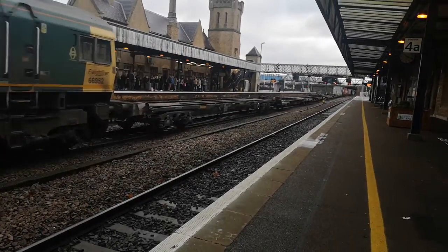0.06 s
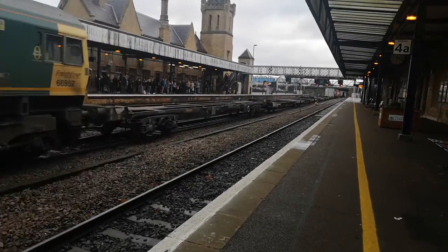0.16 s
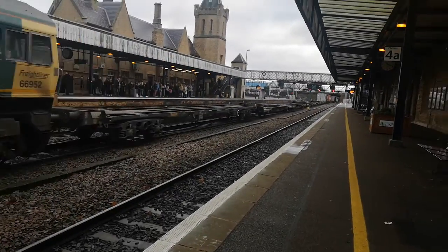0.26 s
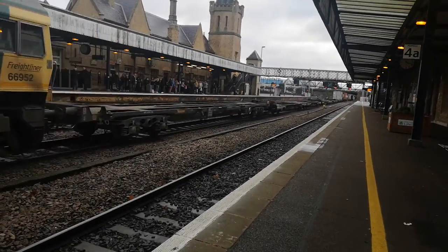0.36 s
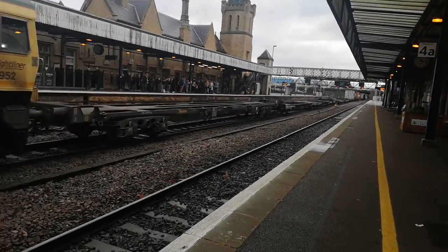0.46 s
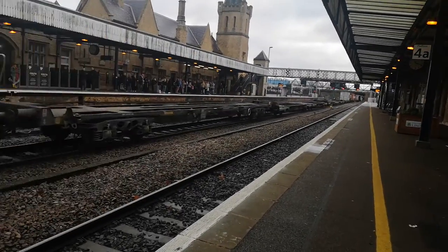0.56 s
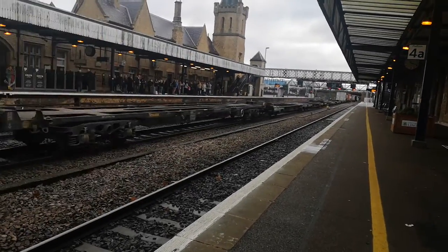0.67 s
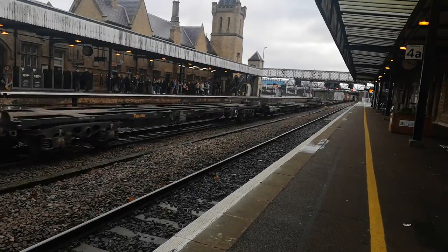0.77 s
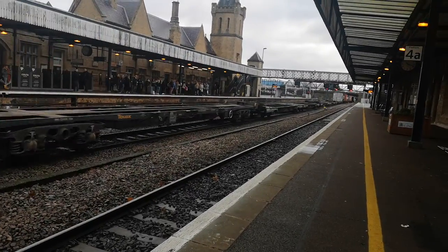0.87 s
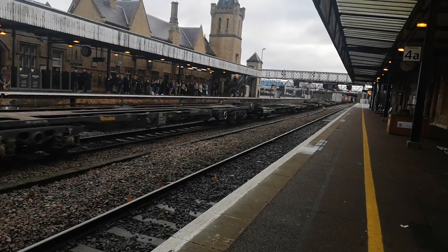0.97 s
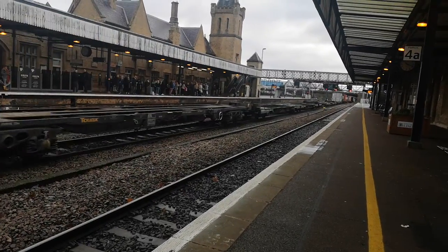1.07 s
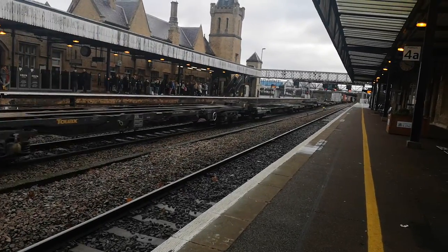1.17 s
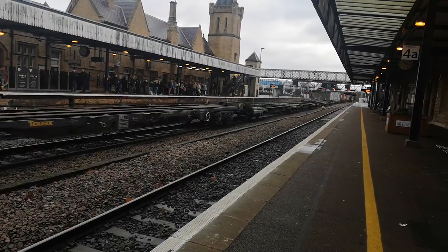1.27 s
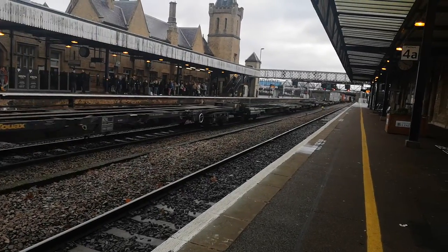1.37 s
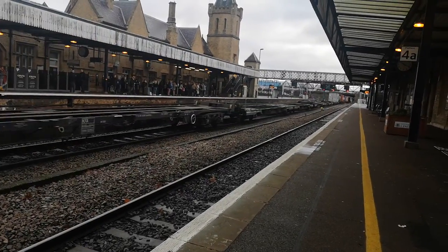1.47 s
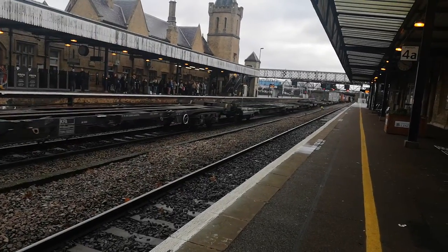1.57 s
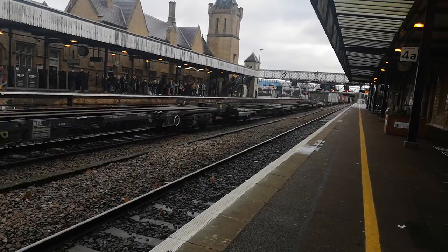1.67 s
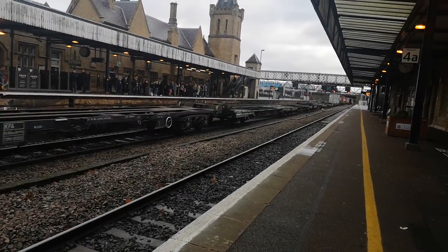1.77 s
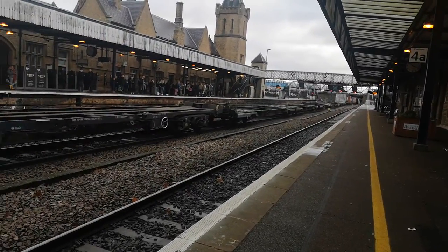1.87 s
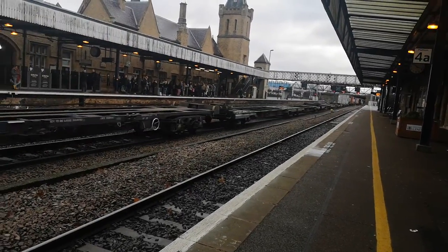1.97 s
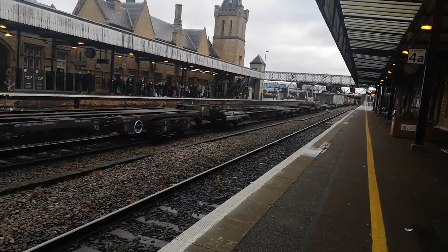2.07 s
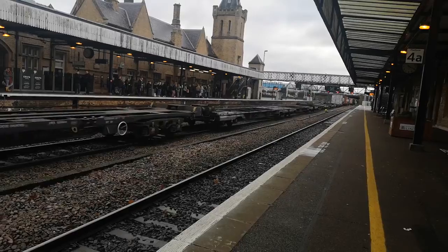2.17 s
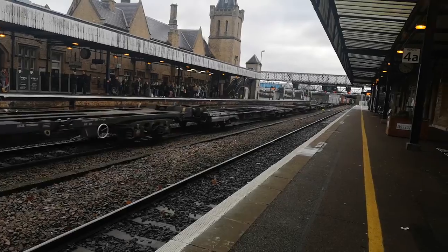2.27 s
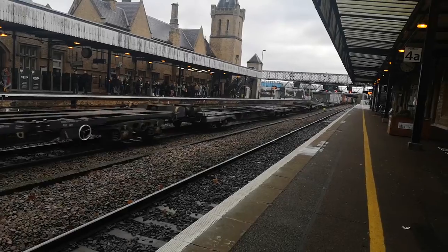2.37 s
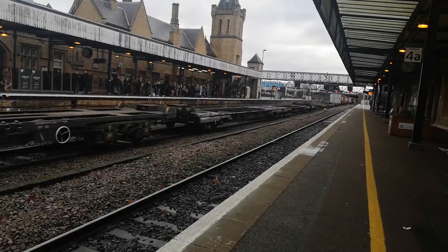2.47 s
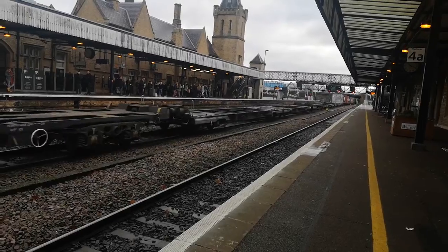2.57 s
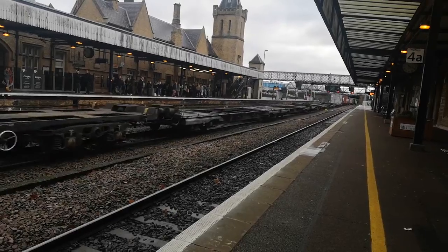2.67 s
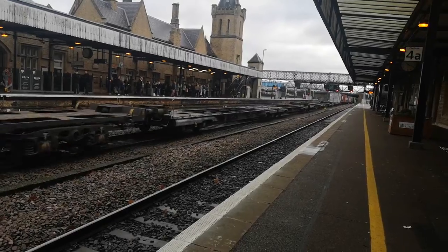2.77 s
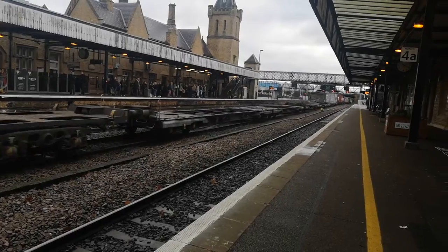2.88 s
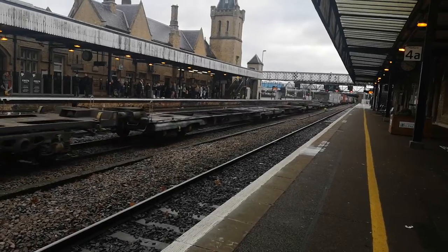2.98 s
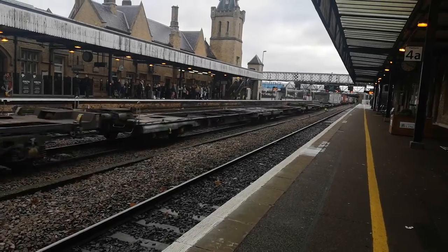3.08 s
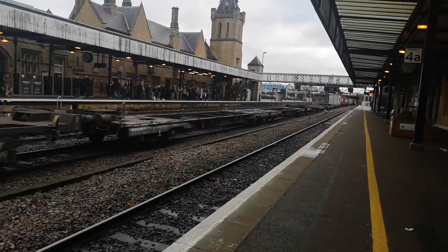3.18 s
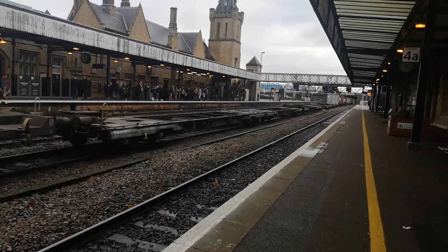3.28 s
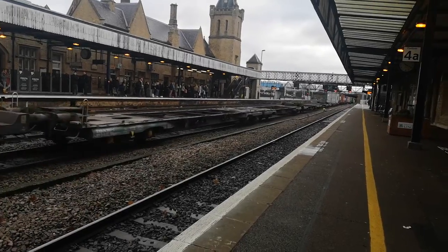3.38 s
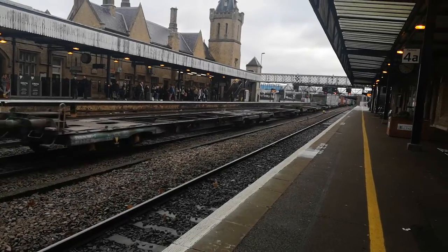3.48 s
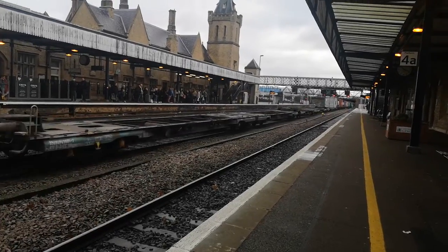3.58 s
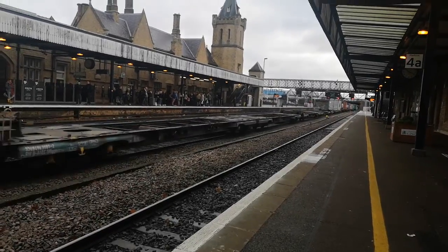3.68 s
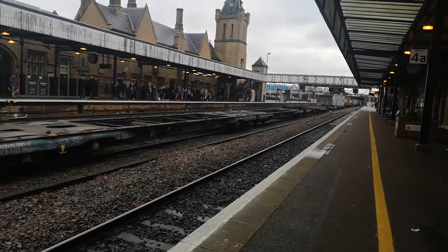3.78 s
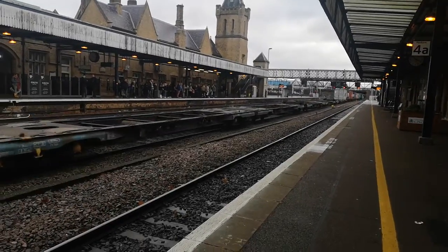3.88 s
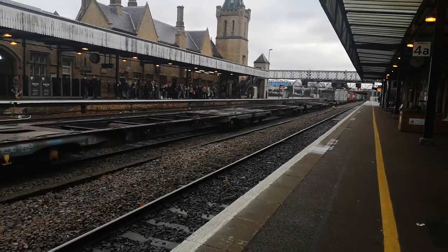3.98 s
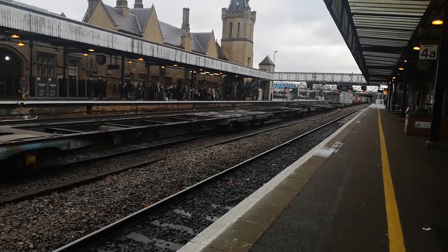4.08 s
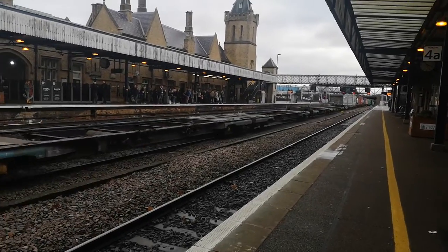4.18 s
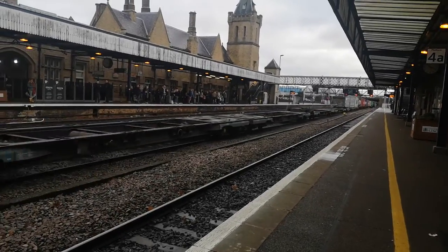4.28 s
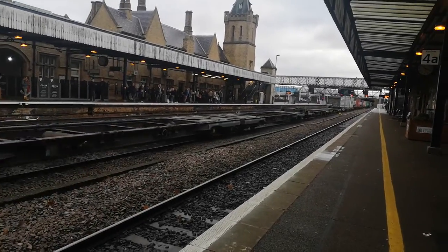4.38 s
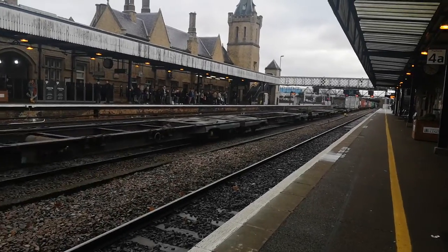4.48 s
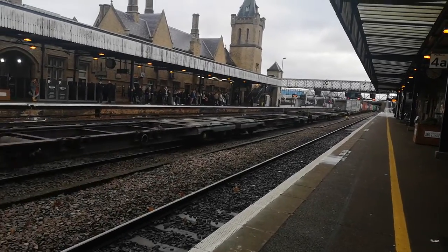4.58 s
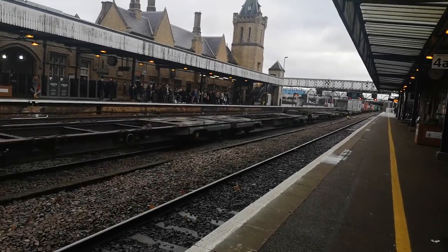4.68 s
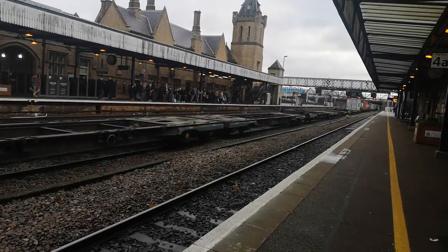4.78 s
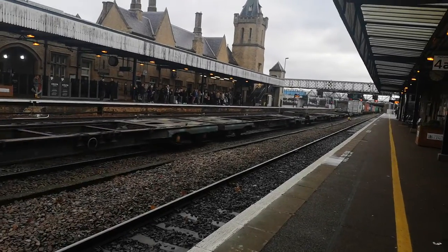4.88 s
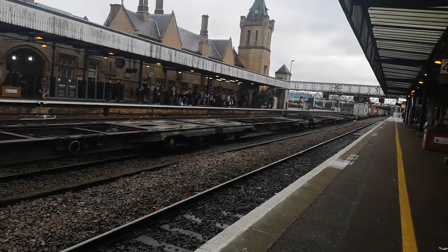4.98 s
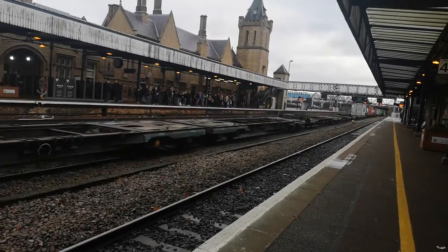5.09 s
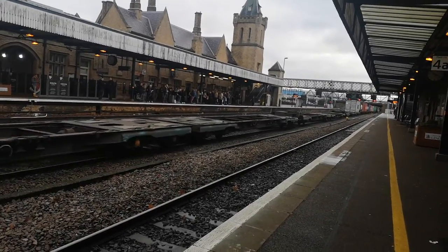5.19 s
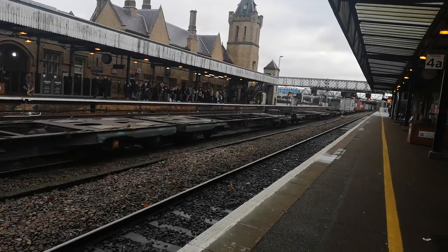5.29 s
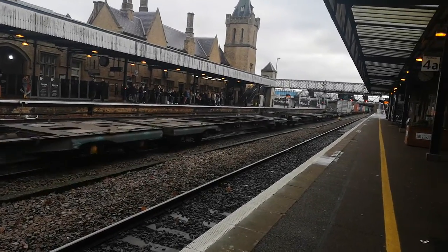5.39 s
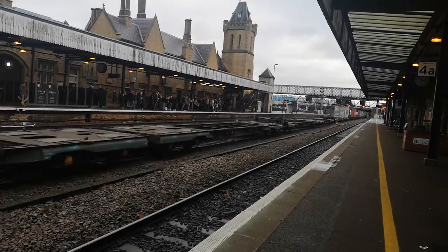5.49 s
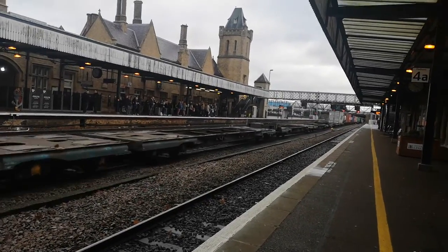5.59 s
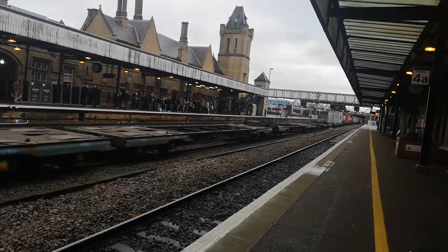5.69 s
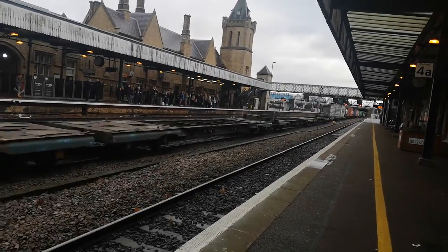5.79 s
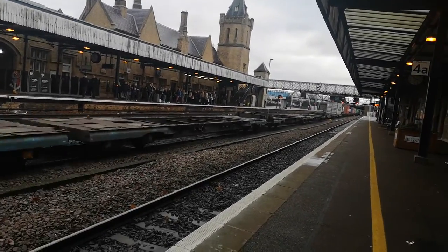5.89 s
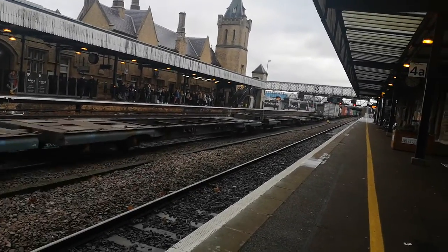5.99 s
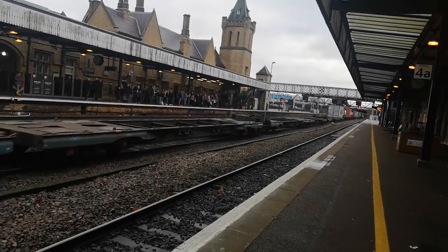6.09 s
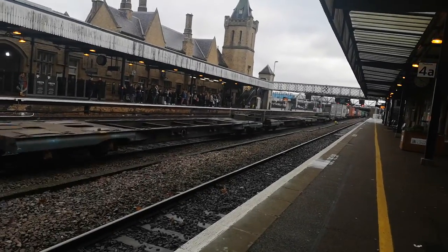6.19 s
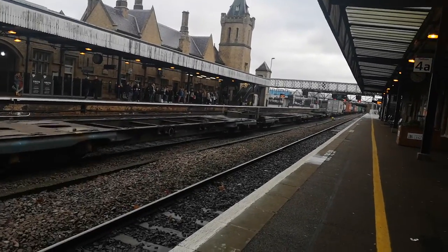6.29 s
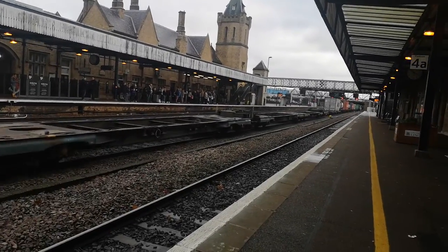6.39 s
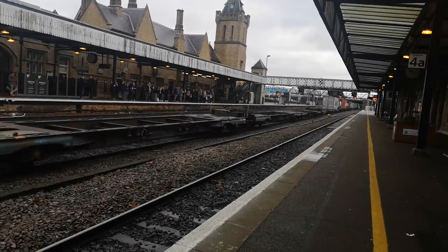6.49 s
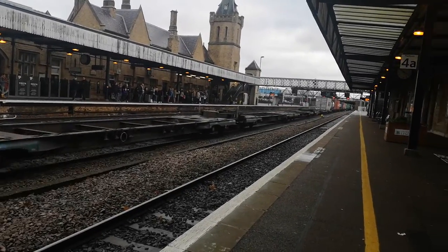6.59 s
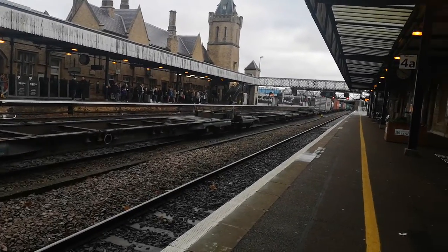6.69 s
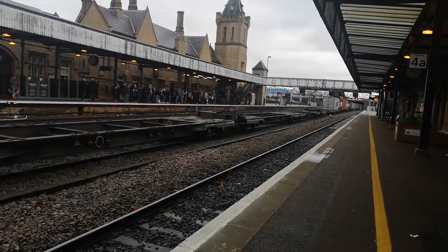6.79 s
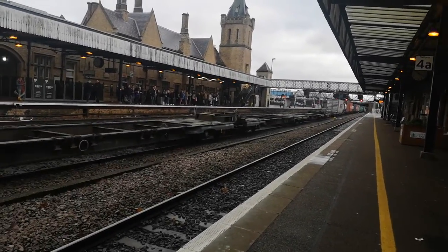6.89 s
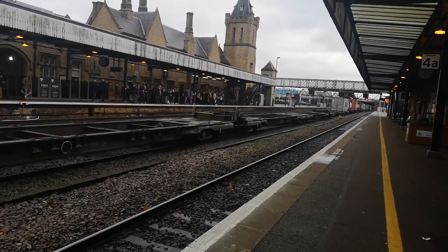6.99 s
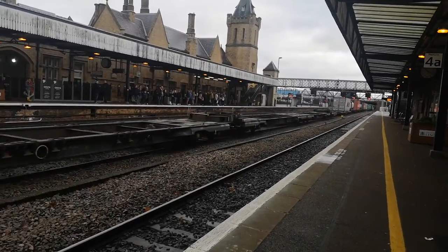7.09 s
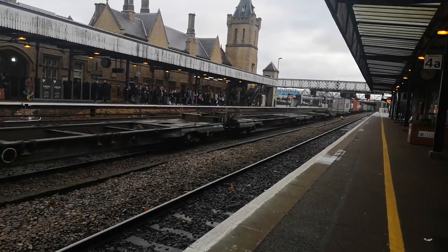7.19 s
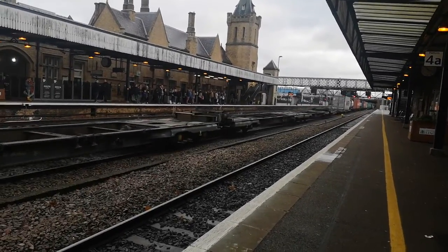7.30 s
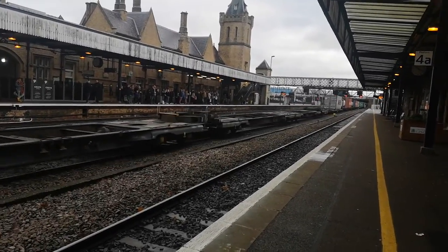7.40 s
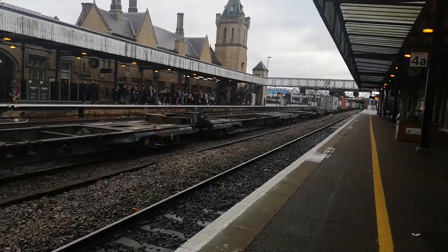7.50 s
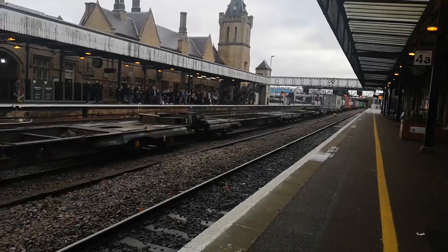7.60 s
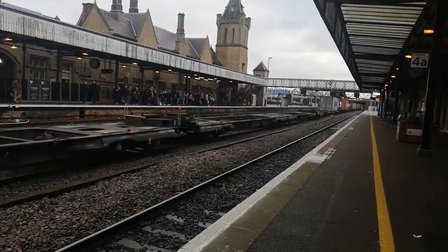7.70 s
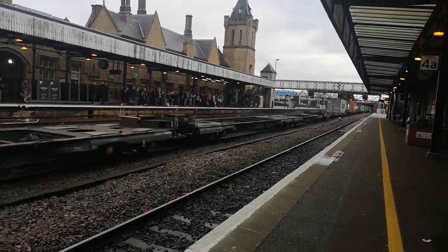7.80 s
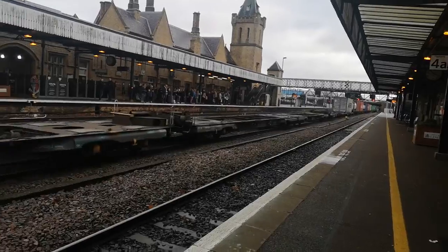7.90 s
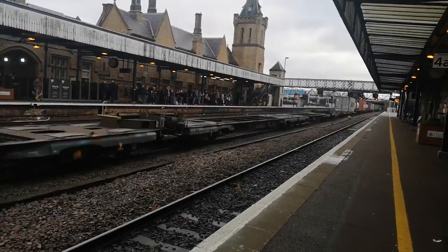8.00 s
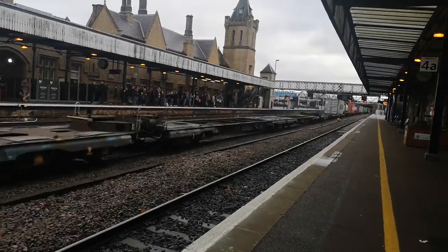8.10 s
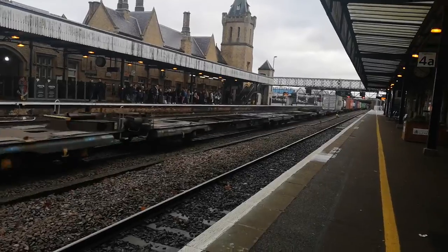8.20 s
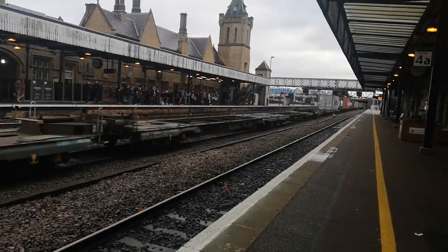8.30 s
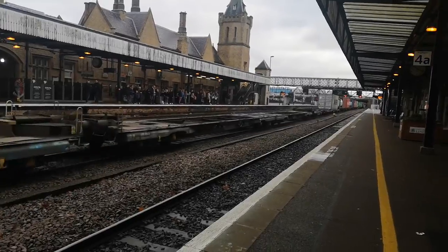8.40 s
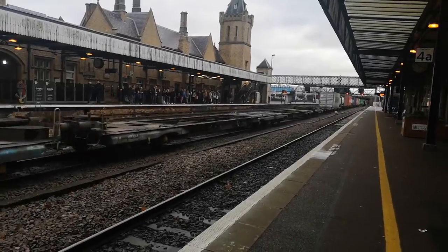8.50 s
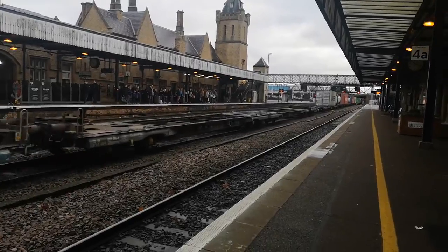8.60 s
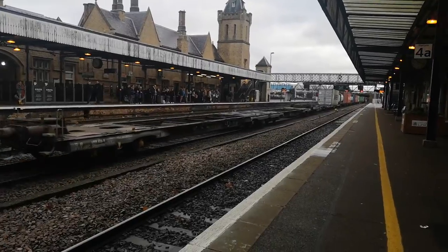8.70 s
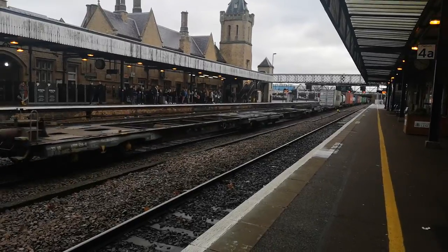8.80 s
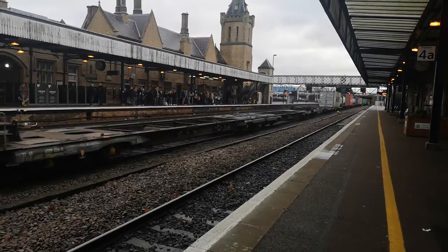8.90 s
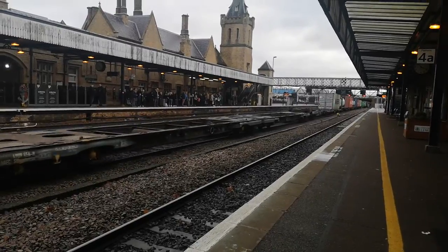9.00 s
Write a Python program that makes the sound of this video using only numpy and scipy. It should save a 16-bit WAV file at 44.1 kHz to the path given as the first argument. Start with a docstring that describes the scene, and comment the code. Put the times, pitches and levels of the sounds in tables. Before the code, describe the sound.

At a roofed station platform, a diesel locomotive passes very close with a strong, deep, buzzing throb, rapid bright ticks on the left and faint whines. After about two seconds its wagons draw level with rumble, dull frame booms, steely rolling noise and hiss. The engine fades away, wheels ring softly, and a low steady hum grows at the end. Handheld stereo microphone beside the track.

```python
"""An idling diesel locomotive rolls out of a roofed station, pulling flat wagons past the platform.
First its exhaust throbs as sines on orders of the crank, its valve gear ticks as bursts of noise and its
gears and fans whine. The wagons then draw level: coloured noise rumbles and hisses, while narrow noise and
wandering tones ring on the wheels and rail. Frames boom and couplings clink along the way, the exhaust
recedes, and towards the end a low hum draws near."""
import sys
import numpy as np
from scipy import signal
from scipy.fft import rfft, irfft, next_fast_len
from scipy.io import wavfile

SR = 44100
rng = np.random.default_rng(int(sys.argv[2]) if len(sys.argv) > 2 else 0)


def materialize(psi):
    """Save the field psi as 16-bit PCM at rate SR to the path in sys.argv[1].

    A 1-D psi becomes a single channel; in a 2-D psi each row is a channel.
    """
    bounded = np.clip(np.atleast_2d(psi).T, -1, 1)
    quanta = np.round(bounded * 32767).astype(np.int16)
    wavfile.write(sys.argv[1], SR, quanta)


N = 398654
SECONDS = np.arange(N) / SR
SIZE = next_fast_len(N)
HZ = np.maximum(np.arange(SIZE // 2 + 1) * SR / SIZE, 1)   # FFT grid, kept above 0 for its logarithm

# Stereo field of the noise: pitch_hz, likeness (0 to 1)
CHANNEL_LIKENESS = [(120, 1), (200, .93), (300, .77), (450, 0), (600, .8), (1000, .7), (1300, .13),
                    (3000, .2), (9000, .3)]
# Phase by which the left channel leads: pitch_hz, lead_rad
LEFT_LEAD = [(340, 0.61), (600, 3.84), (1030, 2.64), (1810, 6.2), (3010, 10.26), (6120, 20.8),
             (8960, 29.85)]
# Left level over right: pitch_hz, balance_db
LEFT_BALANCE = [(300, 0), (420, -1), (550, 1), (800, 2), (1250, 1), (2400, 1), (4600, 5), (7100, 7),
                (8300, 3.5), (10000, -3.5)]

# Shaking of the platform, spectrum: pitch_hz, relative_db_per_hz
GROUND_SPECTRUM = [(14, -25), (22, -3), (38, -1), (58, 7.5), (72, 4.5), (95, 6.5), (130, -47), (200, -110)]
# Shaking of the platform, level: time_s, level_db
GROUND_LEVEL = [(0, -31), (2.5, -37), (5, -42), (7, -36), (9.04, -41.5)]

# Near rail singing under the first wagons, mode: pitch_hz, half_width_hz, relative_db
RAIL_MODES = [(2395, 150, 0)]
# Near rail, level: time_s, level_db
RAIL_LEVEL = [(1.6, -68), (2.1, -46), (2.8, -48), (4.3, -43.5), (5.2, -68)]

# Clinks of the couplings: start_s, level_db, pitch_hz, left_over_right_db
COUPLING_CLINKS = [(2.07, -36, 4100, 7), (6.81, -43, 5300, 7), (7.11, -38, 3650, 4)]

# Modes of panels under the locomotive: pitch_hz, half_width_hz, relative_db
LOCO_PANELS = [(182, 4.5, -2.5), (332, 24, -21.5), (639.3, 17.5, -27.5)]
# Modes of panels under the wagons: pitch_hz, half_width_hz, relative_db
WAGON_PANELS = [(44, 5.8, -7.5), (102, 8.1, -5.5), (199.6, 4.4, -6.5), (211.7, 9.1, -3)]
# Drumming of the panels: time_s, locomotive_level_db, wagon_level_db
PANEL_LEVELS = [(0, -34, -66), (1.1, -37, -51), (2.5, -32, -47), (3.4, -35.5, -38.5), (5.2, -40.5, -34.5),
                (5.9, -43.5, -41), (6.6, -48, -47), (7.5, -44.5, -43.5), (9.04, -40, -47)]

# Brief booms of wagon and engine frames: centre_s, half_length_s, level_db, pitch_hz
FRAME_BOOMS = [(0.246, 0.077, -23, 182), (0.443, 0.1, -40.5, 319), (0.47, .07, -25, 180.9),
               (0.543, 0.05, -41.5, 360), (.68, 0.086, -42.5, 317.5), (0.756, 0.15, -30, 184.4),
               (1.345, 0.072, -32.5, 186), (1.374, 0.095, -36, 250.3), (1.685, 0.14, -25, 181),
               (2.004, 0.14, -31.5, 181.7), (2.278, 0.055, -26.5, 203.8), (2.304, 0.17, -44, 437),
               (2.3, 0.12, -30.5, 151), (2.476, 0.071, -28.5, 155), (2.52, 0.11, -25.5, 178),
               (2.767, 0.048, -26, 252), (2.824, 0.046, -26, 182.4), (3.163, 0.058, -22.5, 185.1),
               (3.406, 0.078, -27.5, 214.5), (3.437, 0.096, -24, 171.2), (4.218, 0.11, -40.5, 297.5),
               (4.488, 0.2, -30, 131.3), (4.52, 0.11, -36, 164.4), (4.7, 0.08, -31.5, 184.5),
               (4.903, 0.025, -24, 179.5), (5.335, 0.077, -29.5, 197), (5.66, 0.062, -30.5, 102),
               (5.697, 0.32, -35.5, 197.7), (6.003, 0.12, -28.5, 99.4), (6.3, 0.065, -30.5, 101.3),
               (6.738, 0.066, -30.5, 100), (7.55, 0.084, -30.5, 102), (7.897, 0.085, -31, 102)]
BOOM_WAVER_HZ = 1.505

HUM_HZ, HUM_END_DB, HUM_DB_PER_S = 103.5, -18.5, 17

# Levels of the train: time_s, rumble_db, roar_db, rolling_db, hiss_db
TRAIN_LEVELS = [(0, -28, -39, -39, -44), (.9, -30, -38.5, -39, -46), (1.8, -26, -40.5, -39.5, -45),
                (2.15, -24, -35.5, -35.5, -42), (2.8, -24.5, -36, -36.5, -43.5),
                (3.3, -23.5, -38, -35.5, -42.5), (3.7, -25.5, -37.5, -36.5, -42.5),
                (4.0, -25, -38, -36, -42), (4.45, -24.5, -39.5, -37.5, -43), (5.3, -28, -40, -39, -45.5),
                (5.5, -27.5, -40, -38.5, -47), (6.2, -30, -41, -39.5, -50), (7.4, -27.5, -43, -40.5, -47.5),
                (8.3, -29.5, -42.5, -41.5, -49.5), (9.04, -32, -46, -40.5, -50)]
# Spectrum of the rumble of frames and track: pitch_hz, relative_db_per_hz
RUMBLE_SPECTRUM = [(15, -12.5), (40, -6), (58, -1), (74, -0.5), (100, -4), (120, -6.5), (140, -2.5),
                   (185, 0), (230, -5), (300, -12), (420, -20.5), (520, -66), (800, -110)]
# Spectrum of the roar of wheel on rail: pitch_hz, relative_db_per_hz
ROAR_SPECTRUM = [(220, -10), (380, -4), (430, -6), (520, -5), (650, -6.5), (765, -6), (865, -8), (905, -6),
                 (1020, -13.5), (1350, -22.5), (1760, -53), (2970, -120)]
# Spectrum of rolling noise under the wagons: pitch_hz, relative_db_per_hz
WAGON_ROLLING_SPECTRUM = [(740, -12), (1250, -4.5), (1450, -5.5), (1800, -1.5), (2340, -0.5), (2640, -3.5),
                          (2820, -6), (3050, -5.5), (3500, -10.5), (3800, -11), (4700, -16), (6110, -24.5),
                          (10300, -120)]
# Spectrum of the duller rolling noise under the locomotive: pitch_hz, relative_db_per_hz
LOCO_ROLLING_SPECTRUM = [(740, -17), (1150, -8), (1320, -1), (1700, -1.5), (1900, 1), (2350, 1.5),
                         (2450, -2.5), (2900, -3), (3150, -6), (3550, -13.5), (3850, -11), (4700, -22.5),
                         (6110, -31), (10300, -120)]
# Spectrum of the hiss: pitch_hz, relative_db_per_hz
HISS_SPECTRUM = [(1500, -62), (2600, -3.5), (4400, -2.5), (5650, -4), (6340, -5.5), (6900, -4), (7560, -5),
                 (7950, -6.5), (8300, -12), (9250, -15), (9900, -29), (11000, -51), (14000, -94.5)]
# Spectrum of the thin top of the hiss: pitch_hz, relative_db_per_hz
TOP_SPECTRUM = [(8500, -30), (9800, -1.5), (12000, -5), (15000, -12)]
# Surges of the hiss: centre_s, half_length_s, rise_db
HISS_SURGES = [(0.215, .03, -2), (0.446, 0.035, 4.5), (0.784, 0.032, 6), (0.973, 0.059, 6),
               (1.332, 0.054, 4), (2.048, 0.082, 4.5), (3.24, 0.092, 1.5), (5.203, .08, 1.5),
               (5.873, 0.055, 2.5), (6.618, 0.087, 2), (6.974, 0.039, 5.5), (7.15, 0.11, 4.5)]
TOP_UNDER_DB, TOP_SURGE = -28, 1.8   # thin top relative to the hiss; dB it rises per dB of surge
WAGONS_ARRIVE_S, ARRIVAL_S = 1.89, 0.28   # midpoint and time constant of the crossfade

# Modes of the wheels: pitch_hz, half_width_hz, relative_db
WHEEL_MODES = [(1230, 55, -9), (1608, 42, .5), (1670, 70, -4), (2392, 70, 1), (2735, 35, -2),
               (2815, 45, -2.5), (3238, 58, -5), (3605, 95, -8), (4095, 66, -7), (5110, 190, -13),
               (7220, 200, -16)]
# Wagon wheels drawing level: time_s, gain_db
WHEEL_GAIN = [(0, -25), (4, -2), (5.6, -2), (9.04, -2)]
WHEEL_NOISE_DB, SINGING_DB = -40, -43   # both before the wheel gain
SINGING_SPREAD = .5   # wander of the clear tones, in mode half-widths

# Whines of the locomotive: pitch_hz, waver_hz, relative_db, left_over_right_db
WHINES = [(443, 2, -7, 4), (893, 5, 0, 3), (2345, 8, -1.5, 0), (3025, 13, 3, 3), (5530, 38, -4.5, 6)]
# Course shared by the whines: time_s, level_db, pitch_factor
WHINE_COURSE = [(0, -50, 1.012), (.35, -50, 1.003), (.9, -51, 1), (1.8, -54.5, .995), (3.2, -57, .991),
                (5, -78, .99)]

# Ticks of the valve gear, about six a crank turn: start_s, relative_db, pitch_hz
VALVE_TICKS = [(0.024, -33, 6840), (0.0525, -26, 6780), (0.0807, -26, 7340), (0.169, -33, 6560),
               (0.1984, -23.5, 7200), (0.2274, -26, 7050), (0.2548, -22.5, 7160), (0.285, -26, 6770),
               (0.3157, -34, 6800), (0.3451, -27, 7360), (0.372, -24, 7300), (0.404, -23, 6860),
               (0.432, -20, 7200), (0.4618, -26, 7560), (0.5207, -27, 7800), (0.5506, -30, 7050),
               (0.579, -30, 7090), (0.608, -28, 6960), (0.7262, -35, 7370), (0.7534, -31, 7290),
               (0.7846, -31, 6680), (0.9253, -34, 7300), (1.3623, -31, 6570), (1.4945, -31, 7040),
               (1.7918, -32, 6690), (1.8213, -29, 7090), (1.8502, -30, 6900)]
TICK_LEFT_DB, TICK_LEFT_DB_PER_S = 16.5, -2.5   # left level over right at time 0, and its change
TICK_BRIGHT_HZ, TICK_BRIGHT_DB = 8700, -23   # bright ring relative to the low ring
TICK_BRIGHT_S, TICK_BRIGHT_HALF_S, TICK_BRIGHT_RISE_DB = 0.587, 0.052, 22.5   # it stands out for a moment
TICK_TAIL_HZ, TICK_TAIL_DB, TICK_TAIL_S = 7490, -12.5, 0.016   # the casing sizzles on after each tick

# Speed of the crank as heard: time_s, turns_per_s
CRANK_SPEED = [(0, 5.74), (.9, 5.70), (1.5, 5.63), (4.2, 5.64), (4.9, 5.80), (5.7, 5.69), (6.6, 5.60),
               (8, 5.25), (9.04, 5.1)]
# Strong exhaust orders: order (cycles per turn), near_level_db
STRONG_ORDERS = [(6, -14), (7, -23.5), (8, -26), (9, -12), (15, -16)]
# Orders filled in by uneven cylinders: order (cycles per turn), db_relative_to_strong_sum
WEAK_ORDERS = [(4, -34), (5, -33), (10, -30), (11, -25), (12, -29), (13, -27), (14, -28), (16, -21),
               (17, -22), (18, -22.5), (19, -29), (20, -35), (30, -33)]
# Fading of the exhaust with distance: time_s, gain_db
EXHAUST_RECEDING = [(0, 0), (1.5, -0.5), (3.3, -3), (4.7, -9.5), (6.2, -14.5), (7.2, -18.5), (9.04, -18)]
# Roof echo cancelling one order, or lifting it if negative: order, centre_s, half_length_s, depth_db
ROOF_CANCELS = [(6, 1.7, .6, 4), (6, 2.58, .24, 17), (6, 4.7, .6, -2.5), (6, 5.6, .3, 1), (7, 1.7, .3, 6),
                (7, 2.95, .55, 15), (8, 3.5, 1.3, 15), (9, .6, .3, 2.5), (9, 2.3, .4, 7),
                (9, 3.48, .32, 21), (9, 4.27, .25, 7), (9, 8.2, .9, 10), (15, 2.05, .3, 5),
                (15, 2.75, .38, 9), (15, 5.8, 1.15, 26), (15, 8.6, 1.2, 14), (15, 0, .5, 2)]
EXHAUST_LAG_S = .00026   # the right channel hears the exhaust later
ORDER_SLIP_RAD = .45     # echoes shift the strong orders slowly against each other

KNEE, CEILING, CUTOFF_HZ = .6, .84, 15600   # amplitudes of full scale 1; edge of the removed top


def from_db(db):
    """Logarithmic level: the amplitude gain of a level in dB."""
    return 10 ** (np.asarray(db) / 20)


def rms_one(x):
    """Power normalisation: scales a signal to rms 1."""
    return x / np.sqrt(np.mean(x ** 2) + 1e-20)


def in_time(rows):
    """Linear interpolation: the columns of a time table, sample by sample."""
    time_s, *columns = np.transpose(rows)
    return [np.interp(SECONDS, time_s, column) for column in columns]


def at_hz(points):
    """Logarithmic frequency: a spectrum table interpolated onto the FFT grid."""
    pitch_hz, value = np.transpose(points)
    return np.interp(np.log(HZ), np.log(pitch_hz), value)


def drift(rate_hz):
    """Low-pass random motion: noise through two equal poles at rate_hz, scaled to rms 1."""
    step = 40   # samples between computed values
    pole = np.exp(-2 * np.pi * step * rate_hz / SR)
    white = rng.standard_normal(N // step + 2002)
    slow = rms_one(signal.lfilter([1], [1, -2 * pole, pole * pole], white)[2000:])
    return np.interp(np.arange(N) / step, np.arange(len(slow)), slow)


def swell(centre_s, half_s):
    """Transient envelope: a pointed bump of height 1 in time."""
    return np.exp(-np.abs((SECONDS - centre_s) / half_s) ** 1.5)


def pan(left_over_right_db):
    """Level-difference stereo: gains that share the difference equally between left and right."""
    return from_db(left_over_right_db * np.array([[.5], [-.5]]))


def narrow_band(x, pitch_hz, ratio, order):
    """Resonance: keeps the band within a ratio of the pitch."""
    edges = [pitch_hz / ratio, pitch_hz * ratio]
    return signal.sosfilt(signal.butter(order, edges, "band", fs=SR, output="sos"), x)


def strike(t, rise_s, decay_s):
    """Excitation and damping: an exponential rise times an exponential decay."""
    return (1 - np.exp(-t / rise_s)) * np.exp(-t / decay_s)


def stereo_noise(gain):
    """Partial coherence: coloured noise mixes a shared part, led by the left, with one of each channel's own."""
    shared, left, right = rfft(rng.standard_normal((3, SIZE)))
    alike = np.clip(at_hz(CHANNEL_LIKENESS), 0, 1)
    pitch_hz, lead_rad = np.transpose(LEFT_LEAD)
    late = shared * np.exp(-1j * np.interp(HZ, [0, *pitch_hz], [0, *lead_rad]))
    common = np.sqrt(alike) * np.array([shared, late])
    pair = common + np.sqrt(1 - alike) * np.array([left, right])
    tilt = from_db(at_hz(LEFT_BALANCE) / 2)
    out = irfft(pair * gain * [tilt, 1 / tilt], SIZE)[:, :N]
    return out / np.sqrt(np.mean(out.mean(axis=0) ** 2))   # rms 1 in the mean of both channels


def coloured(spectrum):
    """Spectral shaping: stereo noise following a table in dB per Hz."""
    return stereo_noise(from_db(at_hz(spectrum)))


def ringing(modes, swell_db=2.0):
    """Modal resonance: rough contact keeps clusters of close modes ringing, each swelling in its own time."""
    out = 0
    for pitch_hz, half_width_hz, relative_db in modes:
        peak = np.exp(-((HZ - pitch_hz) / half_width_hz) ** 2)
        gain = from_db(relative_db + swell_db * drift(1.84))
        out = out + gain * np.sqrt(half_width_hz) * stereo_noise(peak)   # level counts per Hz
    return rms_one(out)


def ground():
    """Structure-borne vibration: low noise as the platform shakes."""
    return from_db(in_time(GROUND_LEVEL)[0]) * coloured(GROUND_SPECTRUM)


def rail():
    """Forced resonance: the near rail sings in a narrow band under the first wagons."""
    return from_db(in_time(RAIL_LEVEL)[0]) * ringing(RAIL_MODES)


def clinks():
    """Impact response: each knock of coupling steel is a decaying ring of narrow noise."""
    out, t = np.zeros((2, N)), np.arange(SR // 10) / SR
    for start_s, level_db, pitch_hz, balance_db in COUPLING_CLINKS:
        noise = rng.standard_normal((2, len(t)))
        ring = rms_one(narrow_band(noise, pitch_hz, 1.05, 2)) * np.exp(-t / 0.012)
        i = round(start_s * SR)
        out[:, i:i + len(t)] += from_db(level_db) * pan(balance_db) * ring
    return out


def panels():
    """Plate resonance: sheet metal drums on its modes as the train rolls."""
    loco_db, wagons_db = in_time(PANEL_LEVELS)
    return from_db(loco_db) * ringing(LOCO_PANELS) + from_db(wagons_db) * ringing(WAGON_PANELS)


def frame_booms():
    """Transient resonance: frames boom as short Gaussian swells of slightly wavering low tones."""
    out, waver = np.zeros(N), np.cumsum(BOOM_WAVER_HZ * drift(3.04)) / SR   # waver in cycles
    for centre_s, half_s, level_db, pitch_hz in FRAME_BOOMS:
        first = max(int((centre_s - 4 * half_s) * SR), 0)
        last = min(int((centre_s + 4 * half_s) * SR), N)
        i = np.arange(first, last)
        gain = from_db(level_db) * np.exp(-((i / SR - centre_s) / half_s) ** 2)
        cycles = pitch_hz * i / SR + waver[i] + rng.random()
        out[i] += np.sqrt(2) * gain * np.sin(2 * np.pi * cycles)
    return out


def low_hum():
    """Frequency modulation: a low tone wavers slightly while its trend in dB rises steadily to the end."""
    level_db = HUM_END_DB + HUM_DB_PER_S * (np.arange(N) - N) / SR + 1.2 * drift(7.0)
    cycles = np.cumsum(HUM_HZ + 0.51 * drift(1.7)) / SR
    return np.sqrt(2) * from_db(level_db) * np.sin(2 * np.pi * cycles)


def singing():
    """Lightly damped modes: three wheels at a time hold each as a clear tone that wanders, swells and fades."""
    out = 0
    for pitch_hz, half_width_hz, relative_db in WHEEL_MODES[1:9]:
        for _ in range(3):
            wander_hz = SINGING_SPREAD * half_width_hz * drift(.8)
            cycles = np.cumsum(pitch_hz + wander_hz) / SR + rng.random((2, 1))   # own phase per channel
            out = out + from_db(relative_db + 3.5 * drift(1.1)) * np.sin(2 * np.pi * cycles)
    return from_db(SINGING_DB) * rms_one(out)


def wheels():
    """Modal radiation: noisy clusters and clear tones ring as the wagon wheels draw level."""
    noisy = from_db(WHEEL_NOISE_DB) * ringing(WHEEL_MODES, swell_db=2.5)
    return from_db(in_time(WHEEL_GAIN)[0]) * (noisy + singing())


def rolling_noise(rolling_db, clatter):
    """Contact roughness: wheel-on-rail noise crossfades at equal power from locomotive to wagons."""
    share = 1 / (1 + np.exp((WAGONS_ARRIVE_S - SECONDS) / ARRIVAL_S))
    loco = np.sqrt(1 - share) * coloured(LOCO_ROLLING_SPECTRUM)
    flat = np.sqrt(share) * coloured(WAGON_ROLLING_SPECTRUM)
    return from_db(rolling_db + 0.61 * clatter) * (loco + flat)


def hiss(hiss_db, clatter):
    """Broadband radiation: high noise surges briefly, its thin top rising further."""
    surge_db = sum(rise_db * swell(centre_s, half_s) for centre_s, half_s, rise_db in HISS_SURGES)
    top_db = hiss_db + TOP_UNDER_DB + TOP_SURGE * surge_db + 1.9 * clatter
    body_db = hiss_db + surge_db + 0.73 * clatter + 0.2 * drift(4.0)
    return from_db(top_db) * coloured(TOP_SPECTRUM) + from_db(body_db) * coloured(HISS_SPECTRUM)


def wagons():
    """Superposition of bands: rumble of frames and track, roar and rolling of wheel on rail, and hiss."""
    rumble_db, roar_db, rolling_db, hiss_db = in_time(TRAIN_LEVELS)
    clatter = drift(12.0)   # loose parts make the treble flicker together
    rumble = from_db(rumble_db) * coloured(RUMBLE_SPECTRUM)
    roar = from_db(roar_db + .5 * drift(23)) * coloured(ROAR_SPECTRUM)
    return rumble + roar + rolling_noise(rolling_db, clatter) + hiss(hiss_db, clatter) + wheels()


def whines():
    """Doppler shift: wavering tones of gears and fans sink as the locomotive goes by."""
    level_db, pitch_factor = in_time(WHINE_COURSE)
    out = 0
    for pitch_hz, waver_hz, relative_db, balance_db in WHINES:
        phase = 2 * np.pi * np.cumsum(pitch_hz * pitch_factor + waver_hz * drift(25)) / SR
        late = phase - np.interp(pitch_hz, *np.transpose(LEFT_LEAD))
        flutter_db = 3 * np.array([drift(6.0), drift(6.0)])
        out = out + from_db(relative_db + flutter_db) * pan(balance_db) * np.sin([phase, late])
    return np.sqrt(2) * from_db(level_db) * out


def valve_ticks():
    """Impact and damped resonance: each valve-gear tick is a broad snap and three noisy rings."""
    out, t = np.zeros((2, N)), np.arange(SR // 20) / SR
    casing = signal.butter(6, [5200, 8100], "band", fs=SR, output="sos")
    for start_s, relative_db, pitch_hz in VALVE_TICKS:
        noise = rng.standard_normal((2, len(t)))
        low, bright, tail = (rms_one(narrow_band(noise, hz, 1.045, 3))
                             for hz in (pitch_hz, TICK_BRIGHT_HZ, TICK_TAIL_HZ))
        moment = np.exp(-((start_s - TICK_BRIGHT_S) / TICK_BRIGHT_HALF_S) ** 2)
        bright_db = TICK_BRIGHT_DB + TICK_BRIGHT_RISE_DB * moment
        ring = (low + from_db(bright_db) * bright) * strike(t, 0.002, 0.0053)
        sizzle = from_db(TICK_TAIL_DB) * tail * strike(t, 0.0032, TICK_TAIL_S)
        snap = 3.2 * signal.sosfilt(casing, noise) * strike(t, .0006, 0.0025)
        gain = from_db(relative_db - 8.0) * pan(TICK_LEFT_DB + TICK_LEFT_DB_PER_S * start_s)
        i = round(start_s * SR)
        out[:, i:i + len(t)] += gain * (ring + sizzle + snap)
    return out


def exhaust():
    """Harmonic synthesis: sines on the crank orders fade with distance and roof echoes; weak ones waver."""
    turn = 2 * np.pi * np.cumsum(in_time(CRANK_SPEED)[0]) / SR   # crank angle in radians
    receding_db = in_time(EXHAUST_RECEDING)[0]
    out, power = 0, 0
    for order, near_db in STRONG_ORDERS:
        cancel_db = sum(depth_db * swell(centre_s, half_s)
                        for k, centre_s, half_s, depth_db in ROOF_CANCELS if k == order)
        gain = np.sqrt(2) * from_db(near_db + receding_db - cancel_db)
        out = out + gain * np.sin(order * turn + order + ORDER_SLIP_RAD * drift(0.38))
        power = power + gain ** 2
    strong = np.sqrt(power)
    for order, relative_db in WEAK_ORDERS:
        phase = order * turn + 0.55 * drift(0.23) + rng.uniform(0, 2 * np.pi)
        out = out + strong * from_db(relative_db + 3 * drift(1.2)) * np.sin(phase)
    return np.array([out, np.interp(SECONDS - EXHAUST_LAG_S, SECONDS, out)])


def scene():
    """Linear superposition: platform, track, wagons and locomotive add together."""
    background = ground() + rail() + clinks() + panels() + frame_booms() + low_hum()
    return background + wagons() + whines() + valve_ticks() + exhaust()


def record(dry):
    """Saturation and low-pass filtering: the highest peaks are rounded, then the top is cut."""
    room = CEILING - KNEE
    over = np.maximum(np.abs(dry) - KNEE, 0)
    rounded = dry - np.sign(dry) * (over - room * np.tanh(over / room))
    return signal.sosfilt(signal.cheby2(16, 70, CUTOFF_HZ, fs=SR, output="sos"), rounded)


dry = scene()
out = record(dry)
materialize(out)
```